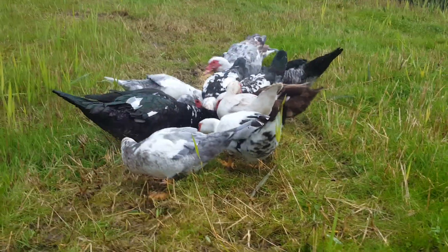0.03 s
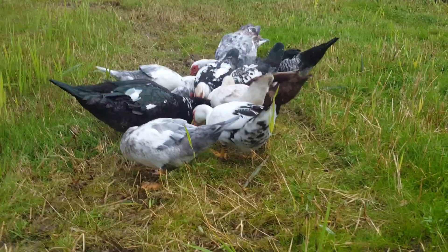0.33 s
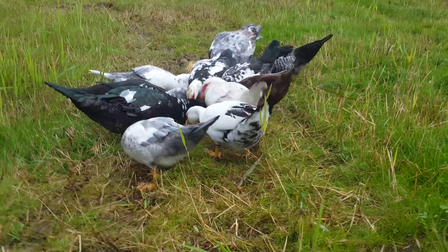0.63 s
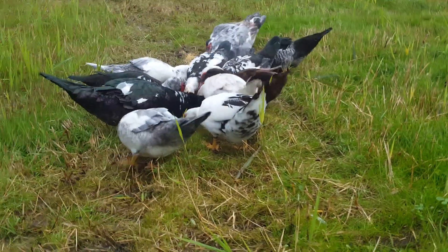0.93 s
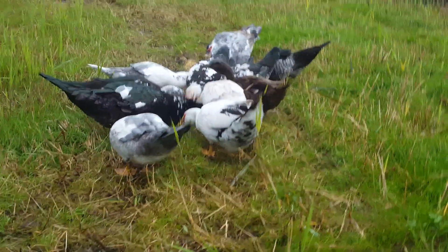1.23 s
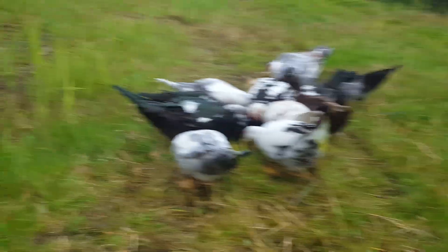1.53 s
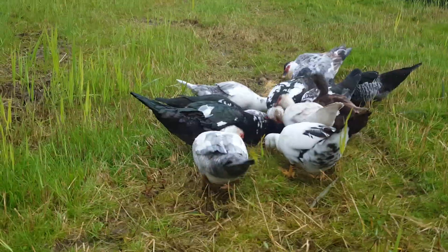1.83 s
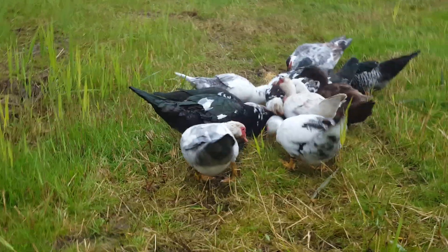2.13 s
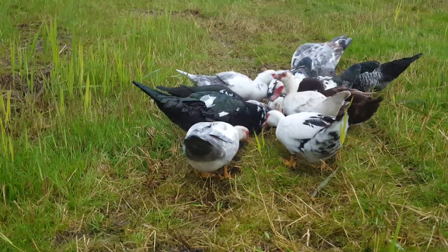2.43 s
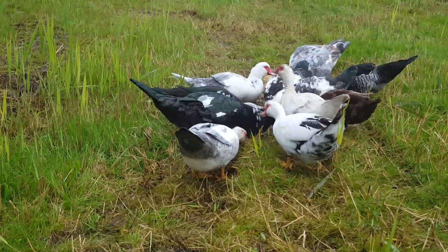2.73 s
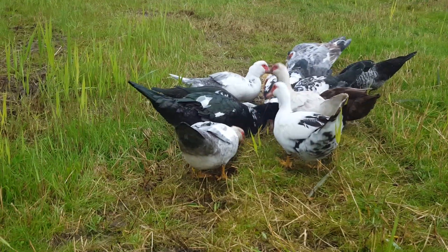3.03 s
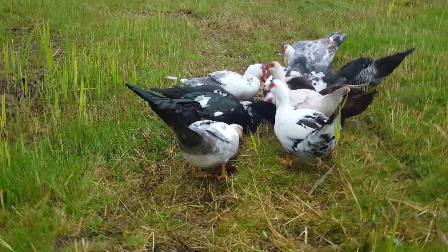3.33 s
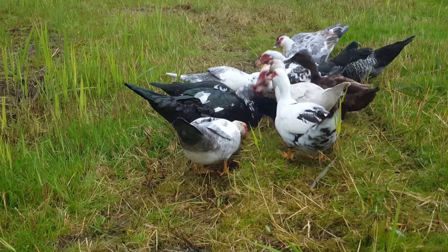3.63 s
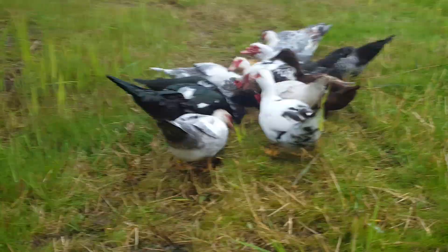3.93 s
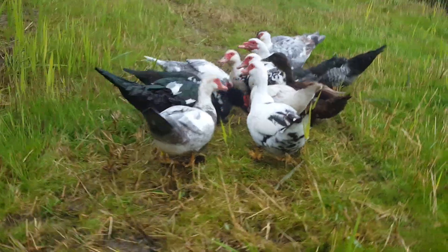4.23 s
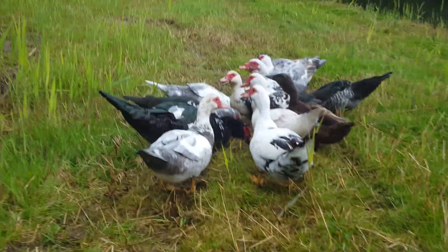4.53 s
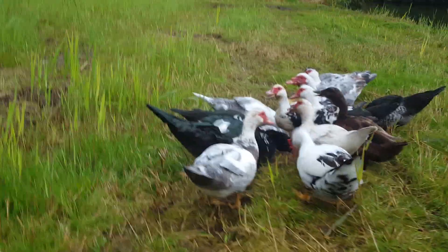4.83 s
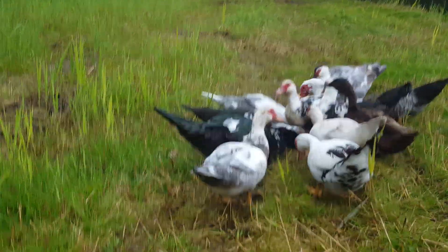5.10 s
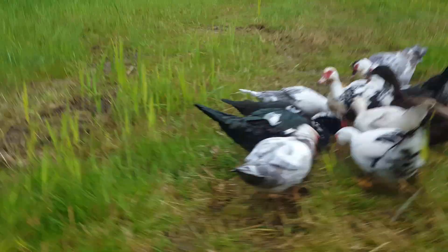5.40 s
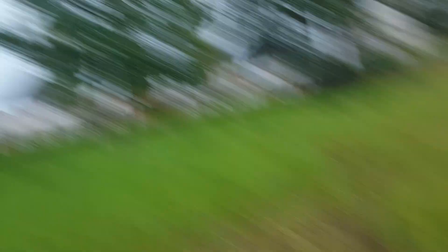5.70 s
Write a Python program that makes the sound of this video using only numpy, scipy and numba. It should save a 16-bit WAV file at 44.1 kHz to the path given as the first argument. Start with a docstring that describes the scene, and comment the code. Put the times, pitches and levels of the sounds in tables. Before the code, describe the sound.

A huddle of ducks feeds close by on grass, with light bill taps, four short, soft clucks and the thin click of a stalk breaking. About two seconds in, a run of six raspy calls begins, each rising and falling in pitch. Three swelling, breathy hisses follow one another through and after the calls, each with a sinking whistle. Faint wind on the microphone and early far-off chirps fill the quiet outdoor background.

```python
"""Over faintly rumbling air and a far bird's chirps, a duck clucks softly four times, while bills patter
in wet grass and a stalk snaps. Another duck of the huddle gives six hoarse, arching calls, and others
answer with three wheezy hisses that end in a falling whistle. Clucks and calls are membrane pulses
ringing the throat; hisses are air forced through a narrow throat and chopped by a slack membrane."""
import sys
import numpy as np
from scipy import signal
from scipy.fft import rfft, irfft
from scipy.io import wavfile
from scipy.ndimage import uniform_filter1d
from numba import njit

SR = 44100
rng = np.random.default_rng(int(sys.argv[2]) if len(sys.argv) > 2 else 0)


def unload_audio(sound):
    """Save the sound as a 16-bit wav file, at the path given as the first command line argument."""
    columns = np.transpose(np.atleast_2d(sound))
    # keep every value between -1 and 1, then stretch to whole-number steps
    steps = np.round(np.clip(columns, -1, 1) * 32767)
    wavfile.write(sys.argv[1], SR, steps.astype(np.int16))


N = 258426
T = np.arange(N) / SR


def undb(db):
    """Decibels to gain."""
    return 10 ** (np.asarray(db) / 20)


def unit(x):
    """Scale to rms 1."""
    return x / np.sqrt(np.mean(x ** 2) + 1e-18)


def noise():
    """White noise."""
    return rng.standard_normal(N)


def drift(rate_hz):
    """Smooth random drift, rms near 1."""
    step = max(int(SR / rate_hz), 1)
    return unit(uniform_filter1d(np.repeat(noise()[:N // step + 1], step), step))[:N]


def bump(at_s, half_width_s):
    """Gaussian rise to 1 and fall."""
    return np.exp(-((T - at_s) / half_width_s) ** 2)


def gate(start_s, end_s, fade_s=0.014):
    """On between two times, with linear fades."""
    return np.clip(np.minimum(T - start_s, end_s - T) / fade_s + .5, 0, 1)


def add(out, x, start_s):
    """Mix x into out from start_s on."""
    i = max(int(start_s * SR), 0)
    out[i:i + len(x)] += x[:N - i]


def pulses(cycles):
    """A click at each whole cycle, shared between two samples."""
    before = np.r_[cycles[0], cycles[:-1]]
    wrap = np.floor(cycles) > np.floor(before)
    late = wrap * (cycles % 1) / np.maximum(cycles - before, 1e-9)
    return late + np.roll(wrap - late, 1)


def colour(x, points):
    """Minimum-phase filter through (f/Hz, gain/dB) points."""
    hz, db = np.transpose(points)
    log_hz = np.log(np.fft.rfftfreq(2048, 1 / SR) + 1)
    log_gain = np.log(undb(np.interp(log_hz, np.log(hz), db)))
    cepstrum = irfft(log_gain) * np.r_[1, np.full(1023, 2), 1, np.zeros(1023)]
    return signal.fftconvolve(x, irfft(np.exp(rfft(cepstrum))))[:len(x)]


def band(x, hz, width_hz):
    """One resonance, gain 1 at its centre."""
    hz = min(hz, SR / 2 - 1000)
    return signal.lfilter(*signal.iirpeak(hz, hz / min(width_hz, SR / 4), fs=SR), x)


def highpass(x, hz):
    """Second-order high-pass."""
    return signal.sosfilt(signal.butter(2, hz, "high", fs=SR, output="sos"), x)


@njit
def sweep(x, hz, width_hz):
    """Moving state-variable filter; returns (band-pass, low-pass)."""
    out, band_state, low_state = np.empty((2, len(x))), 0., 0.
    for i in range(len(x)):
        g, damping = np.tan(np.pi * min(hz[i] / SR, .45)), width_hz[i] / hz[i]
        v = (band_state + g * (x[i] + 1e-18 - low_state)) / (1 + g * (g + damping))
        out[0, i], out[1, i] = damping * v, low_state + g * v
        band_state, low_state = 2 * v - band_state, low_state + 2 * g * v
    return out


def formant(x, hz, widths_hz):
    """Band-passes in series on one moving centre."""
    for width_hz in widths_hz:
        x = sweep(x, hz, np.full(N, width_hz))[0]
    return x


def pan(x, lag_ms, right_db):
    """Stereo by lag and gain of right against left; the bass gets equal levels and half the lag."""
    hz = np.fft.rfftfreq(N, 1 / SR)
    apart = 1 / (1 + (750 / (hz + 1)) ** 4)
    half = undb(apart * right_db / 2) * np.exp(-1j * np.pi * hz * lag_ms / 1000 * (1 + apart) / 2)
    return irfft(rfft(x) * np.array([1 / half, half]), N)


# Outdoor air spectrum: f/Hz, gain/dB
AIR_SPECTRUM = [(15, -45), (25, -16.5), (49, 3), (122, 3.5), (233, -2), (945, -18.5), (1450, -25.5),
                (1900, -25), (2560, -30.5), (3170, -30.5), (5010, -35), (7300, -41.5), (8350, -40),
                (9550, -49), (15500, -46.5)]
# A brief handling rustle, then broad rises in the background: centre t/s, length/s, rumble/dB, rustle/dB
BACKGROUND_SWELLS = [(1.51, 0.33, -52.5, -56.5), (2.752, 2.04, -54, -53.5), (4.6, 6, -61, -63.5)]


def open_air(still_rumble_db=-57, still_rustle_db=-63.5):
    """A centred rumble under a wide, fine rustle; both rise briefly once, then broadly."""
    low, high = undb(still_rumble_db), undb(still_rustle_db)
    for at_s, length_s, rumble_db, rustle_db in BACKGROUND_SWELLS:
        swell = bump(at_s, length_s / 2)
        low, high = np.hypot(low, undb(rumble_db) * swell), np.hypot(high, undb(rustle_db) * swell)
    shared, out = noise(), []
    for channel in range(2):
        air = colour(shared + 0.16 * noise(), AIR_SPECTRUM)
        rumble = unit(signal.sosfilt(signal.butter(2, 600, fs=SR, output="sos"), air))
        rustle = unit(highpass(colour(0.56 * shared + noise(), AIR_SPECTRUM), 1170))
        out.append(low * undb(0.7 * drift(12)) * rumble + high * undb(3.3 * drift(42)) * rustle)
    return np.array(out)


# Wind puffs: centre t/s, length/s, level/dB
WIND_PUFFS = [(0.395, 0.082, -54.5), (2.02, 0.087, -44.5), (2.67, 0.045, -53)]


def wind(floor_db=-67.5):
    """Faint low buffeting on the microphone, independent per channel."""
    strength = undb(floor_db) + sum(undb(db) * bump(at, length / 2) for at, length, db in WIND_PUFFS)
    spectrum = [(20, -29), (70, 2.0), (130, -4.5), (300, -43), (1000, -74)]
    return strength * np.array([unit(colour(noise(), spectrum)) for channel in range(2)])


# Distant chirps: t/s, length/s, start f/Hz, end f/Hz, level/dB
BIRD_CHIRPS = [(.02, .06, 3150, 3180, -63), (.52, .08, 3190, 3170, -62), (.965, .125, 7850, 8000, -56),
               (1.175, .055, 3100, 2930, -57), (1.34, .055, 3130, 3200, -60), (1.49, .045, 3170, 3180, -62)]


def small_bird():
    """Thin, gliding tones from far off."""
    out = np.zeros(N)
    for start_s, length_s, from_hz, to_hz, db in BIRD_CHIRPS:
        u = np.linspace(0, 1, int(length_s * SR))
        hz = from_hz + (to_hz - from_hz) * np.sin(2 * u) + 15 * drift(210)[:len(u)]
        add(out, undb(db) * np.sin(np.pi * u) * np.sin(2 * np.pi * np.cumsum(hz) / SR), start_s)
    return pan(out, lag_ms=0.033, right_db=0.55)


# Upper resonances of a cluck: f/Hz, width/Hz, gain/dB
EDGE_MODES = [(2190, 250, -0.5), (3300, 620, -7), (4440, 1900, -7)]


def cluck(length_s, hz, db, throat_hz, bill_hz, bill_db, edge_db):
    """A short run of uneven membrane pulses, slowest midway, rings throat and bill."""
    jitter, shimmer_db, breath = .03, 1.2, .015
    t = np.arange(SR // 8) / SR
    uneven, force, air = (x[:len(t)] for x in (drift(215), drift(300), noise()))
    u = np.clip(t / length_s, 0, 1)
    swell = np.abs(np.sin(np.pi * u ** 1.02)) ** 0.69 * (u < 1) * undb(shimmer_db * force)
    cycles = np.cumsum(hz * (1 + 0.426 * (2 * u - 1) ** 4 + jitter * uneven)) / SR + .5
    beat = (pulses(cycles) + breath * air) * swell
    throat = band(band(beat, throat_hz, 510), 0.94 * throat_hz, 480)
    bill = band(band(beat, bill_hz, 480), bill_hz, 740)
    breathy = beat + 0.08 * air * swell
    edge = sum(undb(gain_db) * band(breathy, f, width) for f, width, gain_db in EDGE_MODES)
    edge = colour(edge, [(1200, -14), (2100, 2.5), (4700, -8.5), (6500, -21)])
    voice = -throat + undb(bill_db) * bill + undb(edge_db) * edge
    voice = voice + .3 * np.interp(t - .0007, t, voice, left=0)  # ground bounce: the head is low
    return voice * undb(db) / np.sqrt(np.sum(voice ** 2) / (length_s * SR))


def grunt(length_s, db, throat_hz):
    """A few soft pulses behind a shut bill."""
    return cluck(length_s, 218, db, throat_hz, bill_hz=900, bill_db=-6, edge_db=-22)


# Clucks: t/s, length/s, pulse f/Hz, level/dB, throat f/Hz, bill f/Hz,
# then relative gains: bill/dB, edge/dB, opening pulse/dB, closing flutter/dB
SOFT_CLUCKS = [(0.106, .034, 216, -33, 453, 1330, -5.5, -24.5, -28, -7.5),
               (0.407, 0.056, 208, -34.5, 410, 1150, -6.5, -17, -17.5, -43),
               (0.738, .046, 222.2, -32, 385, 1104, -2.5, -17.5, -16.5, -2),
               (1.117, 0.036, 214, -31.5, 453, 1540, 4, -5.5, -15.5, -9.5)]
# Shut-bill grunts: t/s, length/s, level/dB, throat f/Hz
LONE_GRUNTS = [(2.231, 0.0065, -44.5, 700), (5.043, 0.02, -47, 760), (5.536, 0.0068, -51, 525),
               (5.682, 0.01, -49, 514)]


def clucks(opening_lead_s=.043, opening_s=.00595, closing_s=.0144, overlap_s=.005, dull_db=-7.5):
    """Soft pulse, falling squeak as the airway opens, cluck, closing flutter; lone grunts later."""
    out = np.zeros(N)
    glide = np.minimum(T[:SR // 8] / 0.013, 1)
    squeak = np.sin(2 * np.pi * np.cumsum(1280 - 420 * glide) / SR) * np.sin(np.pi * glide)
    for at_s, length_s, hz, db, throat_hz, bill_hz, bill_db, edge_db, open_db, close_db in SOFT_CLUCKS:
        add(out, grunt(opening_s, db + open_db, throat_hz=365), at_s - opening_lead_s)
        add(out, undb(db - 8) * squeak, at_s - .004)
        add(out, cluck(length_s, hz, db, throat_hz, bill_hz, bill_db, edge_db), at_s)
        closing = cluck(closing_s, hz * 1.26, db + close_db, throat_hz * .72, bill_hz * .9,
                        bill_db + dull_db, edge_db + dull_db)
        add(out, closing, at_s + length_s - overlap_s)
    for at_s, length_s, db, throat_hz in LONE_GRUNTS:
        add(out, grunt(length_s, db, throat_hz), at_s)
    return pan(out, lag_ms=0.047, right_db=0.3)


# Bill taps: t/s, peak level/dB before trim, ring f/Hz
BILL_TAPS = [(0.181, -42, 3370), (0.198, -40.5, 3230), (0.269, -45, 8100), (0.4745, -45, 3530),
             (0.632, -46, 3000), (0.664, -44, 2970), (0.7203, -42.5, 3600), (0.902, -43.5, 3680),
             (0.922, -40, 3600), (0.9547, -41.5, 3670), (1.0988, -38, 3070), (1.2062, -39, 2920),
             (1.263, -36, 3850), (1.48, -36, 3500), (1.5402, -37, 4730), (1.656, -38.5, 3070),
             (1.7136, -40.5, 3450), (1.8058, -54, 2930)]


def bills(trim_db=-2, treble_db=-23.5, lead_s=.003):
    """Bills close on wet grass with a short scrape and ring; stalks tick in between."""
    out, t = np.zeros(N), np.arange(SR // 25) / SR
    from_peak_s = np.abs(t - lead_s)
    for (at_s, db, hz), grit in zip(BILL_TAPS, rng.standard_normal((len(BILL_TAPS), len(t)))):
        scrape = grit * (np.exp(-from_peak_s / .0014) + .12 * np.exp(-from_peak_s / .005))
        ring = band(band(scrape, hz, 950), hz, 3900)
        tap = ring + 0.34 * band(scrape, 3000, 3300) + undb(treble_db) * highpass(scrape, 5300)
        add(out, tap / np.abs(tap).max() * undb(db + trim_db), at_s - lead_s)
    ticks_per_s = np.where(T < 1.9, 45, 2)
    ticks = (rng.random(N) < ticks_per_s / SR) * undb(np.minimum(5 * rng.exponential(size=N), 10))
    patter = signal.fftconvolve(ticks, t * np.exp(-t / 0.00063))[:N] * noise()
    spectrum = [(1200, 3), (3300, 5), (5000, 0.5), (8300, -2), (10000, -9.5), (15000, -11)]
    out += undb(-71.5) * unit(colour(patter, spectrum))
    return pan(out, lag_ms=-0.035, right_db=6.2)


# Stalk snaps: t/s, peak level/dB
STALK_SNAPS = [(.504, -32.5), (4.572, -45.5)]


def stalks(lead_s=.002, decay_s=.0009):
    """A dry stalk breaks under a foot with a thin, bright click."""
    out, t = np.zeros(N), np.arange(SR // 50) / SR
    for (at_s, db), grit in zip(STALK_SNAPS, rng.standard_normal((len(STALK_SNAPS), len(t)))):
        crack = grit * np.exp(-np.abs(t - lead_s) / decay_s)
        snap = colour(crack, [(1500, -12), (4300, 9), (7000, -4), (10000, -5.5), (15500, -10)])
        add(out, undb(db) * snap / np.abs(snap).max(), at_s - lead_s)
    return pan(out, lag_ms=0, right_db=1)


def pitch_arch(u, crest, rise=.32, fall=.23):
    """Pitch over top pitch at share u of a call: up to the crest, then down."""
    rising, falling = np.clip(1 - u / crest, 0, 1), np.clip((u - crest) / (1 - crest), 0, 1)
    return 1 - rise * rising ** 2 - fall * falling ** 2.5


def call_effort_db(start_s, length_s, hold_s, catch_db, attack_s=.048, release_s=.053, depth_db=10.5):
    """Effort through a call: attack, hold, sag and a catch just before the end."""
    attack = np.clip(1 - (T - start_s) / attack_s, 0, 1)
    sag = 1 - np.exp(-(np.maximum(T - start_s - hold_s, 0) / release_s) ** 2)
    return -depth_db * (attack + sag) + catch_db * bump(start_s + length_s - .029, .0074)


# Chest and rasp spectra: f/Hz, gain/dB
CHEST_SPECTRUM = [(120, -40.5), (210, 3.5), (310, 7), (430, -7), (620, -4), (900, -1.5), (1200, 6.5),
                  (2500, -22), (5000, -54.5)]
RASP_SPECTRUM = [(600, -18), (1200, -5.5), (2300, 3), (3000, -8), (3800, 0.5), (4900, -3.5), (6400, -5),
                 (7300, -13), (8600, -15.5), (10000, -42.5), (12500, -22.5), (16000, -57)]
# Hoarse calls: t/s, length/s, top f/Hz, crest/share of length, throat level/dB, hold from start/s,
# throat f/Hz at crest, rasp level/dB, rasp peak/share of length, roughness/0-1, catch/dB
CALLS = [(1.897, 0.23, 290.6, 0.53, -34.5, .13, 1645, -42.5, 0.67, 0.31, 13.5),
         (2.219, 0.27, 322.7, 0.45, -31, 0.14, 1783, -38, 0.53, 0.44, 14),
         (2.587, 0.22, 303.5, .45, -32, 0.099, 1770, -42, 0.51, 0.49, -14),
         (2.92, .2, 284.4, .46, -32, 0.057, 1880, -42, 0.52, .28, -3),
         (3.252, 0.18, 261.3, .46, -31.5, 0.079, 1816, -45, 0.54, 0.26, 4),
         (3.594, .15, 250.7, 0.54, -33, 0.073, 1710, -47, 0.49, .36, 3)]


def hoarse_calls(rasp_width=.51, rasp_drop_db=22):
    """Uneven, arching pulse trains ring a throat that opens and closes; air rasps once a cycle."""
    out = 0
    jitter, shimmer, turbulence, flutter = drift(260), drift(300), noise(), drift(50)
    for at_s, length_s, top_hz, crest, db, hold_s, open_hz, rasp_db, rasp_peak, rough, catch_db in CALLS:
        u = np.clip((T - at_s) / length_s, 0, 1)
        pitch = pitch_arch(u, crest)
        cycles = np.cumsum(top_hz * pitch * (1 + .04 * rough * jitter)) / SR
        beat = unit(pulses(cycles) * undb(5 * rough * shimmer))
        puffs = unit(turbulence * (0.2 + np.exp(-(cycles % 1) / .2)))
        throat = unit(formant(beat + rough * puffs, open_hz * pitch ** .7, widths_hz=(330, 800)))
        chest = unit(colour(beat + .62 * rough * puffs, CHEST_SPECTRUM))
        rasp = unit(colour(puffs + .4 * beat, RASP_SPECTRUM))
        throat_db = db + call_effort_db(at_s, length_s, hold_s, catch_db)
        chest_db = -44 + 0.1 * (throat_db + 25)  # low partials swell less
        rasp_fade_db = rasp_drop_db * (1 - np.exp(-((u - rasp_peak) / rasp_width) ** 2))
        bright = undb(1.1 * flutter) * (undb(throat_db) * throat + undb(rasp_db - rasp_fade_db) * rasp)
        out = out + gate(at_s, at_s + length_s) * (bright + undb(chest_db) * chest)
    return pan(out, lag_ms=-0.2, right_db=7.77)


def hiss(row, spectrum, flutter_db, waver, flap_hz, flap_depth, rings=False):
    """Throat turbulence chopped by a slack membrane, and a whistle that steadies as it sinks."""
    (start_s, end_s, swell_s, level_db, slack_at_s, slack_db, push_db,
     shut_hz, open_hz, whistle_hz, clear_at_s, clear_db, sink_db) = row
    swell_db, buried_db, duck_db = 14.5, -7, -3
    overshoot_hz, settle_s, sink_s, sink_hz_per_s = 90.03, .0505, .105, 3200
    age_s = np.maximum(T - start_s, 0)
    opening, push = np.minimum(age_s / swell_s, 1), bump(end_s - .057, .05)
    effort_db = swell_db * (opening - 1) + slack_db * bump(slack_at_s, .027)
    # The whistle starts sharp, settles, and sinks as the air runs out.
    drop_hz = sink_hz_per_s * np.clip(T - end_s + sink_s, 0, sink_s)
    hz = whistle_hz + overshoot_hz * np.exp(-age_s / settle_s) - drop_hz
    membrane_hz = flap_hz * (hz / 1150) ** .3 * (1 + 0.0435 * drift(150))
    flapping = 1 + flap_depth * np.cos(2 * np.pi * np.cumsum(membrane_hz) / SR)
    turbulence = noise() * flapping * undb(flutter_db * drift(420) + drift(45))
    cutoff_hz = shut_hz * (open_hz / shut_hz) ** opening
    air = sweep(unit(colour(turbulence, spectrum)), cutoff_hz, 1.55 * cutoff_hz)[1]
    sinking = np.clip((1100 - hz) / 150, 0, 1)
    wobble = 1 + waver * (1 - .35 * sinking) * drift(500) + .008 * drift(50)
    phase = 2 * np.pi * np.cumsum(hz * wobble) / SR
    whistle = unit((np.sin(phase) + 0.1 * np.sin(2 * phase)) * undb(2 * drift(110)))
    steady_db = clear_db + buried_db * (1 - bump(clear_at_s, .057)) + 0.46 * effort_db
    # The sinking whistle takes over the flow from the hiss.
    whistle_db = steady_db + (sink_db - steady_db) * sinking
    air_db = level_db + effort_db + push_db * push + duck_db * sinking
    out = undb(air_db) * air + undb(whistle_db) * whistle
    if rings:
        out = out + windpipe(effort_db, push)
    return gate(start_s, end_s) * out


# Hiss spectra: f/Hz, gain/dB
SOFT_SPECTRUM = [(150, -30), (300, 1.5), (450, -21.5), (750, -8), (1100, -2), (1800, 5), (2400, 0.5),
                 (3000, -6.5), (4000, -1), (5400, -6), (7000, -16), (8500, -18.5), (10500, -30.5),
                 (15500, -24)]
SHARP_SPECTRUM = [(150, -25), (320, -2), (500, -15), (850, -7.5), (1200, 0), (1700, 6.5), (2400, 4.5),
                  (3300, -1.5), (4200, -0.5), (5400, -2), (6500, -8.5), (8200, -17), (10000, -30),
                  (15500, -24)]
# Hisses: start t/s, end t/s, swell/s, level/dB, slack t/s, slack/dB, last push/dB, shut cutoff f/Hz,
# open cutoff f/Hz, then the whistle: f/Hz, clearest t/s, clearest level/dB, sinking level/dB
WHEEZES = [(2.48, 3.135, 0.15, -39.5, 2.87, -1, -2.5, 7000, 9200, 1161, 2.855, -44.5, -53.5),
           (3.53, 4.21, 0.47, -36, 4.125, -0.5, -0.5, 3200, 11200, 1119, 3.82, -43.5, -50),
           (4.758, 5.42, 0.26, -35.5, 5.215, -5, 3.5, 2970, 10500, 1128, 4.96, -41.5, -46)]


def hisses():
    """Three hisses swell as bills open, each left of the one before; the last rings the windpipe."""
    first = hiss(WHEEZES[0], SOFT_SPECTRUM, flutter_db=1.5, waver=.0378, flap_hz=333.3, flap_depth=.19)
    second = hiss(WHEEZES[1], SOFT_SPECTRUM, flutter_db=1.5, waver=.038, flap_hz=315.4, flap_depth=.41)
    last = hiss(WHEEZES[2], SHARP_SPECTRUM, flutter_db=2.6, waver=.05, flap_hz=330, flap_depth=.45,
                rings=True)
    return (pan(first, lag_ms=.053, right_db=4.7) + pan(second, lag_ms=.15, right_db=4.3)
            + pan(last, lag_ms=.23, right_db=3.7))


# Windpipe resonances: f/Hz before stretch, width/Hz, gain/dB
WINDPIPE_MODES = [(1370, 150, -8), (1950, 120, 0), (2550, 160, -9), (3020, 170, -5), (4060, 170, -1),
                  (4900, 170, -5)]


def windpipe(effort_db, push, level_db=-45.5, push_db=10.5):
    """Breathy resonances rise with the effort, then sink together and ring out in the last push."""
    stretch = 1.05 + .02 * effort_db - .068 * np.maximum.accumulate(push)
    air = noise()
    ring = sum(undb(db) * formant(air, hz * stretch, widths_hz=(width_hz, 2 * width_hz))
               for hz, width_hz, db in WINDPIPE_MODES)
    return undb(level_db + 1.2 * effort_db + push_db * push) * unit(ring)


def meadow(stereo, t60_s=0.9, tail_db=-18, scatter_db=-11):
    """Weak scatter from the ground, then a thin tail from trees and houses."""
    t = np.arange(SR) / SR
    tail = undb(tail_db) * unit(undb(-60 * t / t60_s) * np.minimum(t / 0.056, 1))
    scatter = undb(scatter_db) * unit(np.exp(-t / .014) * (t > .002))
    send = colour(stereo[1], [(200, 1.5), (700, 4), (1500, -1), (4000, 1.5), (10000, 9)])
    echoes = [noise()[:SR] * (tail + scatter) for channel in range(2)]
    return np.array([signal.fftconvolve(send, echo)[:N] for echo in echoes]) / np.sqrt(SR)


def scene():
    """The flock in the open; sounds made down in the grass carry least far."""
    loud = hoarse_calls() + hisses()
    soft = clucks() + bills() + stalks()
    return loud + soft + meadow(loud + 0.38 * soft) + small_bird() + open_air() + wind()


def record(dry):
    """Steep low-pass at 15750 Hz."""
    return signal.sosfilt(signal.ellip(10, .2, 70, 15750, fs=SR, output="sos"), dry)


dry = scene()
out = record(dry)
unload_audio(out)
```